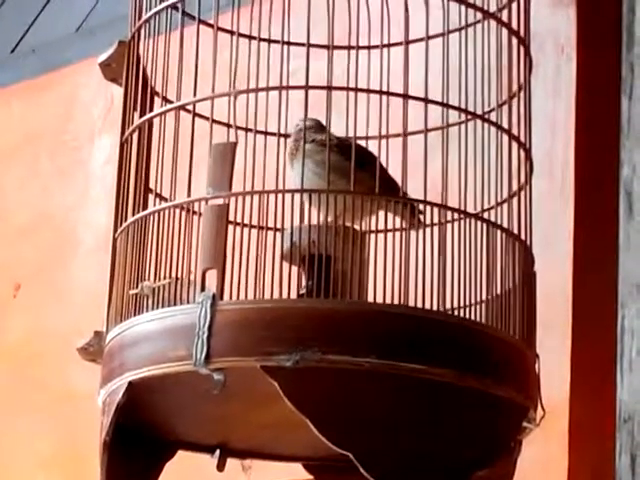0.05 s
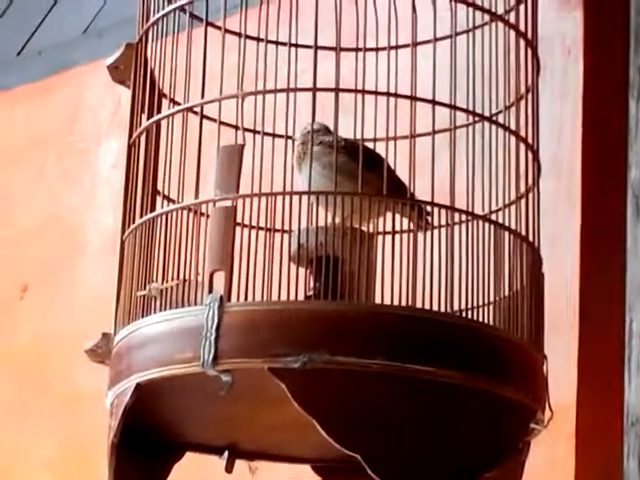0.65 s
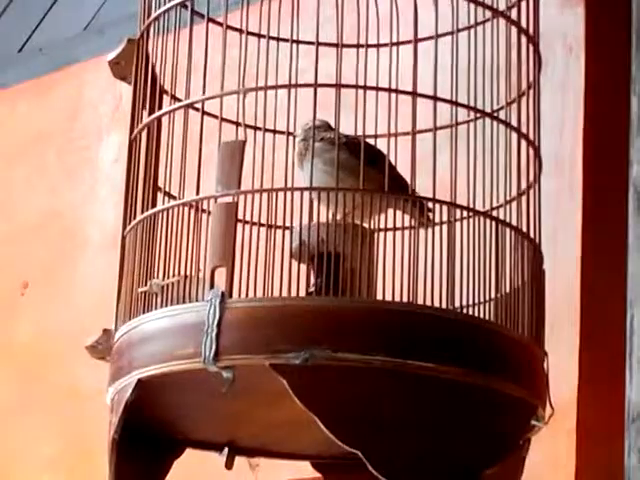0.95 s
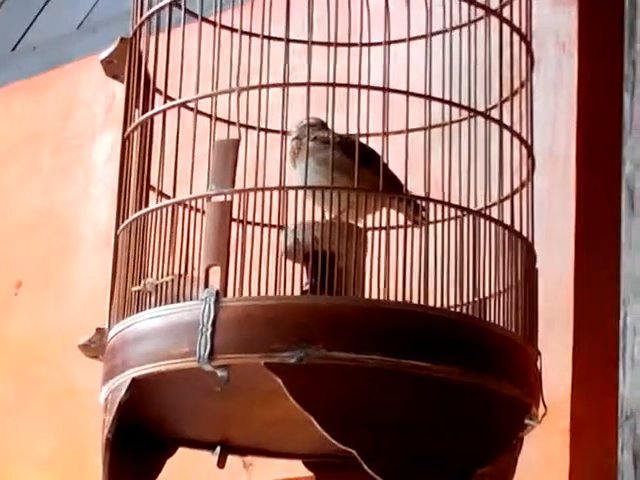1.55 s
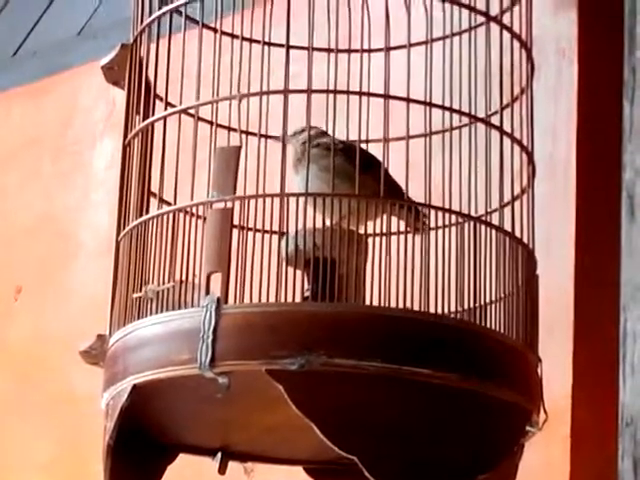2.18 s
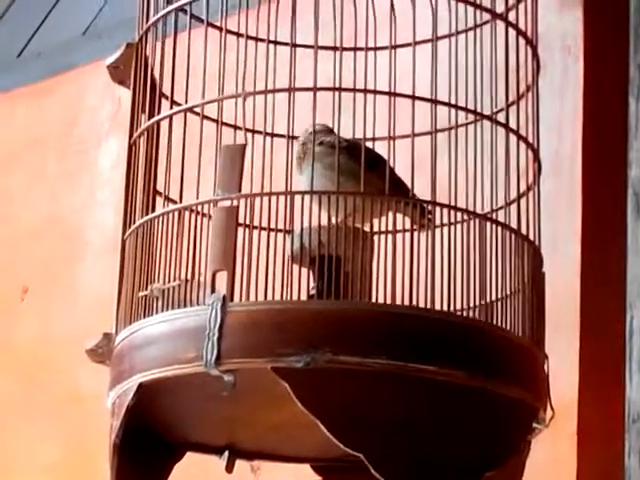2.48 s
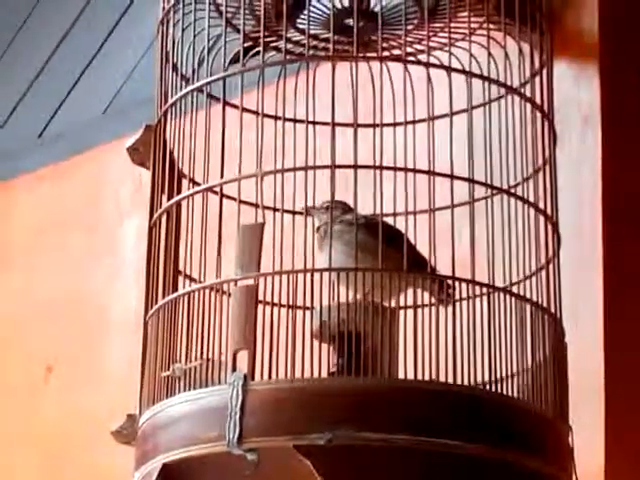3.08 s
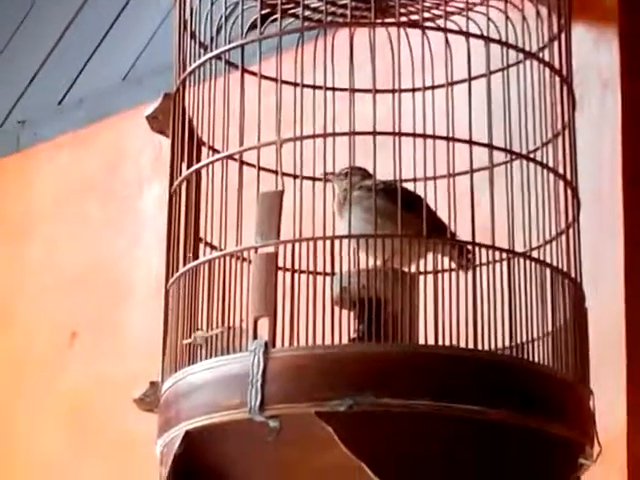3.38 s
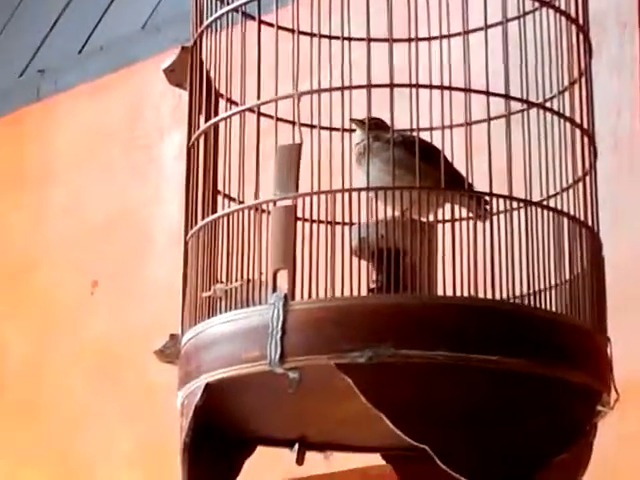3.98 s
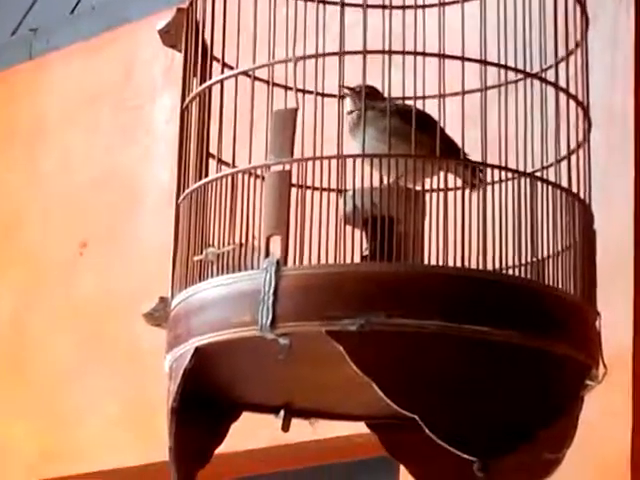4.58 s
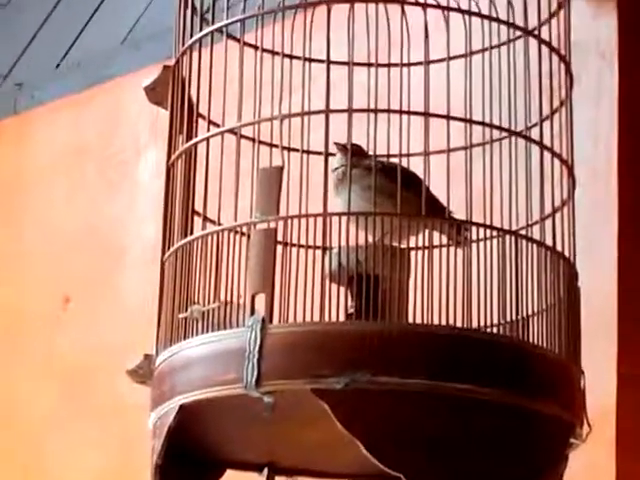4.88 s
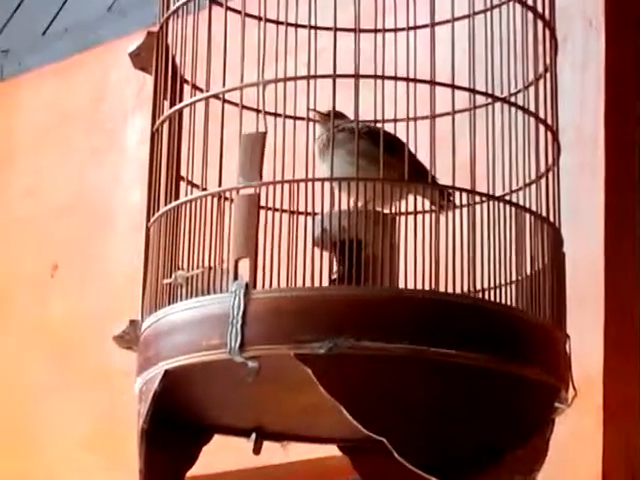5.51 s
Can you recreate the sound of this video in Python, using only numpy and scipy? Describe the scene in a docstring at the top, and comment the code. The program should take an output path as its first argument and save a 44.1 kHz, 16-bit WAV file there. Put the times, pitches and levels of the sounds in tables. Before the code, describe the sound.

In a reverberant room, a small bird in a cage chirps, twitters and trills rapidly, fairly close and slightly to the left. Two loud upward whistles come about two thirds of the way through, followed by more chirps. More distant songbirds call throughout, washed in echo. An idling engine hums and throbs through the walls over faint hiss, growing a little stronger at the end.

```python
"""In a hard-walled hall, a caged lark a metre or two away sings a fast run of chirps, trills and two
loud rising whistles, each a frequency-modulated tone of its syrinx. Other songbirds, further off,
arrive almost only as reverberation, over a soft background noise. Outside an engine idles: harmonics
of its cycle rate, dulled by the walls, make a low beating hum whose upper overtones swell near the end."""
import sys
import numpy as np
from scipy import signal
from scipy.fft import rfft, irfft
from scipy.io import wavfile

SR = 44100
rng = np.random.default_rng(int(sys.argv[2]) if len(sys.argv) > 2 else 0)


def persist_wave(psi):
    """Save psi, clipped to +-1, as 16-bit WAV."""
    counts = np.round(np.clip(psi, -1, 1) * 32767).astype(np.int16)
    wavfile.write(sys.argv[1], SR, np.atleast_2d(counts).T)


N = 249158
TIME = np.arange(N) / SR


def undb(db):
    """Amplitude ratio of a level in decibels."""
    return 10 ** (np.asarray(db) / 20)


def unit(x):
    """Normalisation to an rms of one."""
    return x / np.sqrt(np.mean(x ** 2))


def curves(table):
    """Linear interpolation of each column of a timed table."""
    s, *columns = np.transpose(table)
    return [np.interp(TIME, s, c) for c in columns]


def at(points, hz):
    """Interpolation of (frequency_hz, value) points on a logarithmic frequency axis."""
    f, value = np.transpose(points)
    return np.interp(np.log(np.maximum(hz, 1)), np.log(f), value)


def colour(x, points):
    """Zero-phase filtering by (frequency_hz, gain_db) points."""
    return irfft(rfft(x) * undb(at(points, np.fft.rfftfreq(N, 1 / SR))), N)


def wander(rate_hz):
    """Low-pass noise: random values, smoothly joined, with a spread near one."""
    u = np.arange(N) * rate_hz / SR
    steps = rng.standard_normal(int(u[-1]) + 2)
    k = u.astype(int)
    return steps[k] + (steps[k + 1] - steps[k]) * (1 - np.cos(np.pi * (u - k))) / 2


def delay(x, ms):
    """Fractional delay by a linear phase shift."""
    hz = np.fft.rfftfreq(2 * N, 1 / SR)
    return irfft(rfft(x, 2 * N) * np.exp(-2j * np.pi * hz * ms / 1000))[:N]


def add(track, start_s, sound):
    """Superposition of a sound on a track."""
    i = max(int(start_s * SR), 0)
    part = sound[:max(N - i, 0)]
    track[i:i + len(part)] += part


def glide(ms, start_hz, middle_hz, end_hz, swell=0.036, lateness=1):
    """Parabolic frequency sweep: time axis, pitch and arched envelope of one note."""
    t = np.arange(int(ms * SR / 1000)) / SR
    u = t / t[-1]
    hz = np.polyval(np.polyfit([0, .5, 1], [start_hz, middle_hz, end_hz], 2), u)
    return t, hz, np.abs(np.sin(np.pi * u ** lateness)) ** swell


# Spectrum of the hall's background noise: frequency_hz, relative_density_db
AIR_SPECTRUM = [(25, -17.5), (50, -8), (100, 12.5), (200, -0.5), (300, -15.5), (500, -19.5), (1000, -24.5),
                (2000, -19.5), (3200, -12.5), (5000, -20), (6500, -26), (8000, -42.5)]
# Contour of the faint hiss, followed in part about its median: time_s, contour_db
HISS_CONTOUR = [(0.0, -68), (0.35, -78.5), (0.72, -72), (0.78, -66), (1.32, -66.5), (1.45, -68),
                (3.4, -76.5), (3.6, -61.5), (3.9, -74.5), (4.6, -70), (5.65, -61.5)]


def air(level_db=-42, left_db=1, hiss_follow=0.65):
    """Partly coherent noise: alike on both sides in the bass, wider above, where it comes and goes."""
    mid, side = colour(rng.standard_normal((2, N)), AIR_SPECTRUM)
    side = colour(side, [(100, -19.0), (400, -8.5), (1000, -8), (3500, -2.0)])
    noise = unit(mid + side * np.array([[1], [-1]]))
    hiss = colour(noise, [(400, -33), (900, -2.5)])
    contour_db, = curves(HISS_CONTOUR)
    hiss_gain = undb(hiss_follow * (contour_db - np.median(contour_db)))
    return (noise + hiss * (hiss_gain - 1)) * undb(level_db + left_db * np.array([[.5], [-.5]]))


# The engine's second harmonic: time_s, level_db, beat_rate_hz, depth_ratio
SECOND_HARMONIC = [(0.0, -47, 7.2, 0.46), (0.45, -43.5, 3.3, 0.1), (1.2, -42, 3.3, 0.34),
                   (1.6, -32.5, 5.5, .2), (2.4, -35.5, 7.34, 0.3), (3.1, -38.5, 7.15, 0.44),
                   (3.8, -38, 7.83, 0.8), (4.0, -37.5, 4.2, .6), (4.5, -39.5, 4.2, 0.14),
                   (4.8, -33, 3.83, 1), (5.3, -29.5, 3.41, 0.64), (5.65, -32.5, 3.8, 0.9)]


def throb(crest_s=5.32, max_depth=.95):
    """Amplitude modulation: level in dB of the second harmonic, beating slowly and deeply at the end."""
    db, beat_hz, depth = curves(SECOND_HARMONIC)
    turns = np.cumsum(beat_hz) / SR
    beat = np.cos(2 * np.pi * (turns - np.interp(crest_s, TIME, turns)))
    return db + 20 * np.log10(1 + np.clip(depth, 0, max_depth) * beat)


# Idling speed: time_s, cycle_rate_hz
IDLE_RATE = [(0.0, 37.25), (0.7, 35.43), (1.95, 35.02), (2.7, 35.76), (3.6, 36.23), (4.4, 36.88),
             (5.65, 37.23)]
# Levels of harmonics 3-5 and of the upper band (7-22 with rumble): time_s, third_db, fourth_db,
# fifth_db, upper_db
HARMONIC_LEVELS = [(0.0, -36, -45, -47, -61), (0.3, -42, -41, -48, -62), (0.48, -48, -37, -51, -63),
                   (0.7, -39.5, -44, -47.5, -56), (1.3, -45, -42, -52, -55.5), (1.58, -43, -40, -48, -60.5),
                   (1.8, -41, -32.5, -53, -59.5), (2.27, -44.5, -36, -52.5, -58.5),
                   (2.55, -52, -55, -44, -58.5), (2.75, -45.5, -40, -46.5, -58.5),
                   (3.3, -57, -46.5, -53.5, -58.5), (3.68, -49, -36, -48, -55),
                   (3.95, -43, -39, -50.5, -52), (4.35, -45, -49, -47, -53),
                   (4.73, -37.5, -39.5, -45, -50.5), (5.0, -47.5, -48.5, -50.5, -50.5),
                   (5.33, -49, -44.5, -44, -41.5), (5.65, -34, -41.5, -46, -47)]
# Spectral envelope of the upper band: frequency_hz, relative_db
UPPER_SPECTRUM = [(250, -4), (340, -1.5), (410, -2), (500, -14), (630, -12), (800, -18.5)]


def engine(sixth_below_db=6, upper_wander_rad=0.9, rumble_db=-4, unsteady_db=2.5):
    """Harmonic series on the cycle rate, dulled by transmission through walls; its top wavers most."""
    rate_hz, = curves(IDLE_RATE)
    third, fourth, fifth, upper_db = curves(HARMONIC_LEVELS)
    phase = 2 * np.pi * np.cumsum(rate_hz) / SR
    drone_db = [db + unsteady_db * wander(14) for db in (third, fourth, fifth, fifth - sixth_below_db)]
    hum = upper = 0
    for k, db in enumerate([throb(), *drone_db], 2):
        hum += np.sqrt(2) * undb(db) * np.sin(k * (phase + 0.12 * wander(9)) + 2 * np.pi * rng.random())
    for k in range(7, 23):
        gain = undb(at(UPPER_SPECTRUM, k * rate_hz.mean()) + 3.6 * wander(6.6))
        upper += gain * np.sin(k * phase + upper_wander_rad * wander(22) + 2 * np.pi * rng.random())
    # exhaust turbulence, puffing once a cycle, fills in between the harmonics
    turbulence = colour(rng.standard_normal(N), [(170, -25), *UPPER_SPECTRUM, (1200, -35), (2500, -70)])
    rumble = turbulence * (1 + .5 * np.sin(phase))
    return hum + unit(unit(upper) + undb(rumble_db) * unit(rumble)) * undb(upper_db)


# Thin whistles of the far birds: start_s, length_ms, start_hz, end_hz, level_db
THIN_WHISTLES = [(0.0, 30, 4540, 4430, -37.5), (0.884, 32, 5660, 5220, -39.5),
                 (0.944, 60, 5600, 4250, -37.5), (1.129, 31, 6570, 6560, -40), (1.245, 72, 5880, 4970, -44),
                 (1.25, 57, 3590, 3680, -48), (2.219, 44, 5550, 6070, -36.5), (2.624, 48, 6150, 6100, -43),
                 (3.295, 52, 6500, 6200, -44.5), (3.459, 46, 2716, 2980, -35.5),
                 (3.75, 37, 5470, 5790, -36), (4.02, 53, 6770, 6650, -39.5), (4.939, 31, 3313, 3175, -42),
                 (5.195, 80, 3130, 3640, -33), (5.303, 24, 3370, 2610, -41), (5.453, 75, 6450, 7130, -40)]
# Their rasping buzzes: start_s, length_ms, start_hz, end_hz, level_db, warble_depth_hz
BUZZES = [(0.045, 104, 7400, 6400, -41, 160), (0.209, 160, 4040, 3190, -43, 190),
          (0.416, 98, 6400, 4500, -43, 300), (1.593, 92, 5550, 4224, -31, 320),
          (1.6, 150, 2518, 2861, -26.5, 290), (1.669, 40, 3900, 4210, -35.5, 200),
          (1.88, 113, 6370, 4460, -34, 510), (2.0, 56, 5050, 3950, -31, 600),
          (2.079, 95, 3990, 3840, -34.5, 260), (2.264, 106, 5780, 4730, -28.5, 200),
          (2.414, 40, 6530, 6200, -39.5, 300), (2.902, 48, 4550, 4520, -36, 150),
          (2.93, 79, 6110, 6440, -41, 190), (2.992, 70, 5604, 5350, -34, 160),
          (3.258, 100, 6250, 4400, -30, 270), (3.52, 235, 2620, 2880, -25, 290),
          (3.545, 153, 5800, 3980, -33, 310), (4.085, 29, 6330, 6140, -33.5, 170),
          (4.199, 400, 4250, 4200, -41.5, 150), (4.66, 41, 6580, 5590, -35, 600),
          (4.818, 57, 5050, 4450, -31.5, 200), (4.855, 36, 6400, 5570, -40.5, 400),
          (5.019, 114, 4180, 4100, -41, 140), (5.518, 176, 4980, 4437, -26, 630)]


def far_birds(warble_hz=105, unevenness=.25, rasp=0.618, thin_depth_hz=60, halfway_share=.66):
    """Fast, uneven frequency modulation: shallow, it leaves a whistle; deep, its sidebands buzz."""
    song = np.zeros(N)
    warble_phase = 2 * np.pi * np.cumsum(warble_hz * (1 + unevenness * wander(60))) / SR
    warble = np.sin(warble_phase) + rasp * wander(900)
    calls = BUZZES + [(*row, thin_depth_hz) for row in THIN_WHISTLES]
    for s, ms, start_hz, end_hz, db, depth_hz in calls:
        middle_hz = start_hz + halfway_share * (end_hz - start_hz)  # moves early, then settles
        t, hz, envelope = glide(ms, start_hz, middle_hz, end_hz, swell=0.28, lateness=1.18)
        now = (int(s * SR) + np.arange(len(t))) % N
        phase = 2 * np.pi * np.cumsum(hz + depth_hz * warble[now]) / SR
        add(song, s, np.sqrt(2) * np.sin(phase) * envelope * undb(db))
    return song


# The lark's soft low twittering: start_s, length_s, first_hz, last_hz, level_db
TWITTER_RUNS = [(0.005, 0.19, 1844, 1574, -49.5), (0.566, 0.14, 2250, 2200, -42.5),
                (1.383, 0.02, 2180, 2210, -48), (1.595, 0.27, 2000, 1900, -47),
                (2.998, 0.04, 1706, 1770, -50), (3.093, 0.17, 2150, 2100, -48),
                (3.335, 0.066, 2150, 1850, -48), (3.53, 0.15, 1550, 1550, -54)]


def twitters(rate_hz=36, note_ms=14, dip_octaves=.3, tilt_octaves=.24):
    """Trains of dipping sweeps with random jitter in onset, tilt, pitch and level."""
    for s, length_s, first_hz, last_hz, db in TWITTER_RUNS:
        jitter = rng.standard_normal((16, 4))
        for after, (late, tilt, high, loud) in zip(np.arange(0, length_s, 1 / rate_hz), jitter):
            hz = np.interp(after, [0, length_s], [first_hz, last_hz]) * 2 ** (.08 * high)
            start_hz, end_hz = hz * 2 ** (dip_octaves + tilt_octaves * tilt * np.array([1, -1]))
            yield s + after + 0.0022 * late, *glide(note_ms, start_hz, hz, end_hz), db + 0.9 * loud


def sweep(start_hz, end_hz, rise_ms=12, fall_ms=9.5, sag=0.024):
    """Near-exponential sweep, sagging at its middle; a rise takes longer than a fall."""
    ms = rise_ms if end_hz > start_hz else fall_ms
    return glide(ms, start_hz, np.sqrt(start_hz * end_hz) * (1 - sag), end_hz)


# The lark's quick chirps: start_s, start_hz, end_hz, level_db
CHIRP_NOTES = [(0.016, 3430, 1720, -42), (0.569, 3350, 4700, -39.5), (0.589, 4300, 2900, -24.5),
               (0.616, 3400, 2550, -33.5), (0.632, 3300, 4700, -33), (0.665, 3240, 4730, -23),
               (0.700, 4650, 2700, -39), (0.735, 2770, 1810, -41), (1.391, 3250, 4500, -36),
               (1.408, 4900, 3140, -23.5), (1.416, 3400, 4440, -29), (1.548, 4050, 5600, -41),
               (1.562, 3094, 4700, -35.5), (1.575, 4120, 3200, -31), (1.589, 2210, 3540, -39.5),
               (1.667, 3330, 2270, -29), (1.71, 2450, 3000, -31.5), (1.799, 4180, 3000, -31.5),
               (1.816, 3092, 4910, -28), (1.839, 2890, 4120, -31), (2.44, 2600, 4460, -46),
               (2.452, 3620, 5500, -28.5), (2.475, 5650, 3980, -30), (2.486, 4310, 5430, -26),
               (2.496, 5420, 3830, -28.5), (2.508, 3740, 2710, -35.5), (2.516, 5050, 3054, -26),
               (2.632, 3250, 5530, -35.5), (2.658, 5600, 4600, -32), (2.727, 5160, 3740, -32),
               (2.738, 4205, 5740, -31), (2.749, 4870, 3450, -26.5), (2.761, 4500, 3000, -30),
               (2.98, 4400, 1900, -44), (2.989, 4750, 2800, -35), (3.003, 3083, 4530, -30.5),
               (3.013, 4620, 2710, -28), (3.021, 3300, 4770, -35), (3.143, 3700, 2920, -39),
               (3.18, 4670, 3270, -29.5), (3.192, 3120, 4770, -33.5), (3.201, 4620, 2840, -31),
               (3.405, 2390, 1450, -48.5), (3.669, 4430, 3670, -26.5), (3.962, 3750, 5250, -30),
               (3.996, 4510, 3330, -27.5), (4.148, 2530, 1570, -53.5), (4.617, 6180, 4716, -38.5),
               (4.633, 4720, 3240, -29), (4.652, 4000, 1530, -42.5), (4.862, 4110, 2700, -33),
               (4.885, 2820, 4130, -33.5), (4.921, 3034, 4130, -25.5), (4.929, 3805, 2530, -31),
               (4.955, 2000, 3250, -45.5), (5.05, 6260, 4200, -45), (5.082, 4740, 3570, -33.5),
               (5.091, 3595, 2180, -32), (5.574, 4200, 5700, -27)]


def chirps():
    """Rapid frequency modulation: each note is a single sweep up or down."""
    for s, start_hz, end_hz, db in CHIRP_NOTES:
        yield s, *sweep(start_hz, end_hz), db


# The lark's trills: start_s, length_s, first_top_hz, last_top_hz, fall_octaves, level_db
TRILL_RUNS = [(0.084, 0.035, 3830, 3420, 0.73, -46.5), (1.915, 0.13, 5800, 4350, 0.52, -35.5)]


def trills(rate_hz=47):
    """Periodic trains of falling sweeps, each starting a little lower."""
    for s, length_s, first_hz, last_hz, octaves, db in TRILL_RUNS:
        for after in np.arange(0, length_s, 1 / rate_hz):
            top_hz = np.interp(after, [0, length_s], [first_hz, last_hz])
            yield s + after, *sweep(top_hz, top_hz / 2 ** octaves), db


# The lark's slurred notes: start_s, length_ms, start_hz, middle_hz, end_hz, level_db
SLUR_NOTES = [(0.603, 13, 4400, 4600, 4300, -40), (0.658, 50, 2730, 2580, 2560, -42.5),
              (0.673, 13.7, 3640, 3886, 3340, -31), (2.526, 39.6, 3310, 2650, 1530, -42.5),
              (2.673, 19.5, 4950, 4090, 3990, -25), (2.699, 10, 3860, 4290, 4260, -27),
              (2.773, 21, 3010, 2784, 2540, -43.5), (3.12, 27, 2080, 2504, 2280, -42.5),
              (3.213, 22, 2930, 2584, 1942, -35.5), (3.25, 22, 2820, 2280, 1970, -44),
              (4.636, 10.5, 3600, 3790, 3480, -29.5), (4.714, 34, 4550, 4066, 4200, -33),
              (4.746, 28, 4156, 4215, 4590, -30), (4.896, 18, 3716, 3210, 4240, -28.5),
              (4.911, 8.6, 4100, 3300, 3260, -28.5), (4.936, 15, 3130, 3410, 2880, -38.5),
              (5.058, 12, 4370, 3990, 4050, -25.5), (5.099, 15.5, 2350, 2210, 2100, -41)]


def slurs():
    """Slower frequency modulation: each note arcs through three pitches."""
    for s, ms, start_hz, middle_hz, end_hz, db in SLUR_NOTES:
        yield s, *glide(ms, start_hz, middle_hz, end_hz), db


# The lark's two loud rising whistles, one list of points each: time_s, pitch_hz
WHISTLE_CONTOURS = [
    [(3.721, 3825), (3.749, 3561), (3.779, 3665), (3.809, 4148), (3.827, 4970), (3.838, 5390)],
    [(4.046, 3513), (4.082, 4100), (4.1, 4595), (4.12, 5114), (4.138, 5240)],
]


def whistles(level_db=-23):
    """Sustained oscillation: a long note follows a pitch contour."""
    for contour in WHISTLE_CONTOURS:
        s, pitch_hz = np.transpose(contour)
        t = np.arange(0, s[-1] - s[0], 1 / SR)
        yield s[0], t, np.interp(s[0] + t, s, pitch_hz), np.ones(len(t)), level_db


def lark(whistle_waver=0.0076, chirp_waver=0.045, flutter_db=3.5, octave_db=-36, ebb_db=5):
    """The syrinx, an air-driven valve, gives each note a tone and a weak second harmonic."""
    song, pitch_noise, pressure_noise = np.zeros(N), wander(1400), wander(260)
    for s, t, hz, envelope, db in [*twitters(), *chirps(), *trills(), *slurs(), *whistles()]:
        now = (int(s * SR) + np.arange(len(t))) % N
        waver = np.interp(t[-1], [.02, .036], [chirp_waver, whistle_waver])  # short notes are rougher
        phase = 2 * np.pi * np.cumsum(hz * (1 + waver * pitch_noise[now])) / SR
        tone = np.sin(phase) + undb(octave_db) * np.sin(2 * phase)
        opening, closing = np.minimum(t / 0.0013, 1), np.minimum((t[-1] - t) / 0.00062, 1)
        valve = np.sin(np.pi / 2 * opening * closing)
        # air pressure flutters, and runs out towards the end of the note
        effort_db = db + flutter_db * pressure_noise[now] - ebb_db * (t / t[-1]) ** 4
        add(song, s, np.sqrt(2) * tone * envelope * valve * undb(effort_db))
    return song


def from_left(pair, left_db, lag_ms):
    """Level and time differences: sound from the left reaches that side louder and sooner."""
    return np.array([pair[0] * undb(left_db / 2), delay(pair[1], lag_ms) * undb(-left_db / 2)])


# First echoes from cage floor and wall: delay_ms, left_gain, right_gain
REFLECTIONS = [(1.3, -0.041, 0.02), (4.6, 0.48, 0.28), (9.5, -0.36, -0.33)]


def early_sound(song, direct_db=1.0):
    """Comb filtering: the direct wave interferes with reflections from near surfaces."""
    pair = from_left([song, song], left_db=8.0, lag_ms=0.06) * undb(direct_db)
    for ms, left, right in REFLECTIONS:
        pair += np.array([[left], [right]]) * delay(song, ms)
    return pair


# Reverberation time of the hall: frequency_hz, t60_s
DECAY_TIMES = [(1500, 0.66), (3000, 0.72), (4500, 0.65), (7000, 0.61)]
# Likeness of the reverberation on the two sides: frequency_hz, correlation
COHERENCE = [(1000, 0.78), (2000, 1), (4000, 0.36), (7000, 0.92)]


def hall(x, build_s, early_boost, early_s):
    """Reverberation: dense echoes build up, drop faster at first, then decay exponentially by band."""
    t = np.arange(SR) / SR
    hz = np.fft.rfftfreq(SR, 1 / SR)
    mid, side = rfft(rng.standard_normal((2, SR)))
    alike = at(COHERENCE, hz)
    noise = np.sqrt((1 + alike) / 2) * mid + np.sqrt((1 - alike) / 2) * side * np.array([[1], [-1]])
    onset = (1 - np.exp(-t / build_s)) * (1 + early_boost * np.exp(-t / early_s))
    band_hz, t60_s = np.transpose(DECAY_TIMES)
    response = 0
    for t60, share in zip(t60_s, np.eye(len(band_hz))):
        band = irfft(noise * np.interp(hz, band_hz, share), SR)
        decay = onset * undb(-60 * t / t60)
        response += band * decay / np.sqrt(np.sum(decay ** 2))
    return signal.fftconvolve(x[None], response, axes=1)[:, :N]


def scene(lark_room_db=0.8, far_direct_db=-12):
    """Superposition of all sources; the direct-to-reverberant ratio sets the birds near or far."""
    song, others = lark(), far_birds()
    lark_room = undb(lark_room_db) * hall(song, build_s=0.0073, early_boost=2.2, early_s=0.06)
    near = early_sound(song) + from_left(lark_room, left_db=3.0, lag_ms=0.038)
    far = hall(others, build_s=0.0033, early_boost=0.042, early_s=0.035) + undb(far_direct_db) * others
    return near + from_left(far, left_db=2.0, lag_ms=0.059) + engine() + air()


# Frequency response of the microphone: frequency_hz, gain_db
MIC_RESPONSE = [(20, -1), (1000, -2.5), (6000, -1.5), (7200, 1), (8000, -5.5), (8700, -21.5)]


def record(dry, cutoff_hz=8300):
    """Band limiting: the microphone dulls the top octave, and a steep low-pass filter cuts it off."""
    low_pass = signal.ellip(8, .2, 80, cutoff_hz, fs=SR, output="sos")
    return signal.sosfilt(low_pass, colour(dry, MIC_RESPONSE))


dry = scene()
out = record(dry)
persist_wave(out)
```